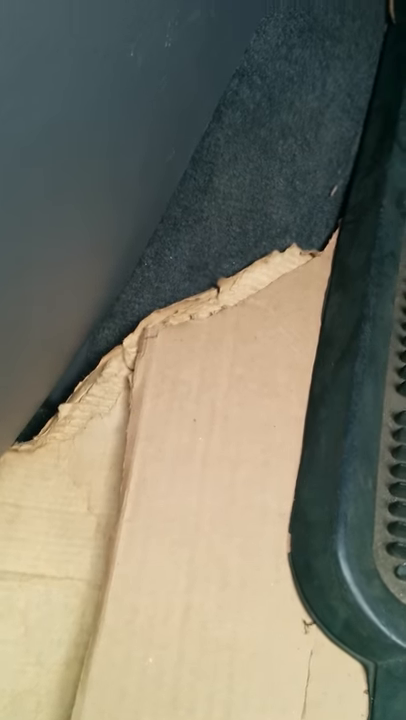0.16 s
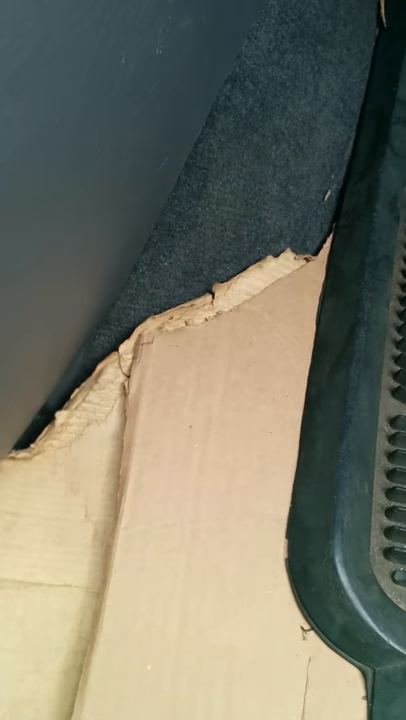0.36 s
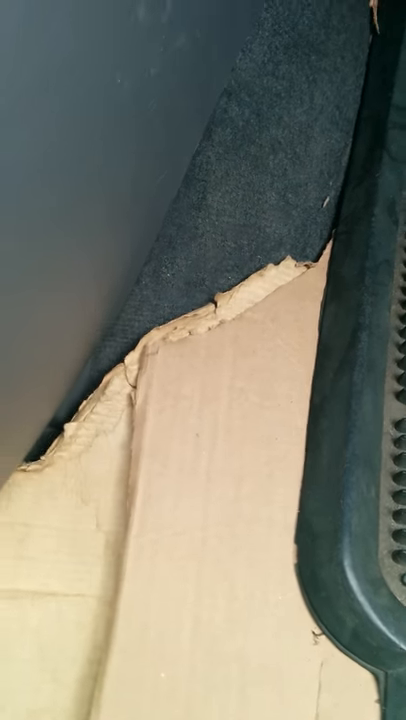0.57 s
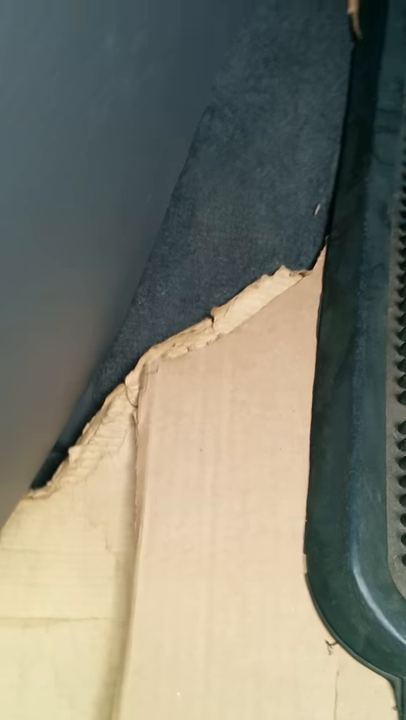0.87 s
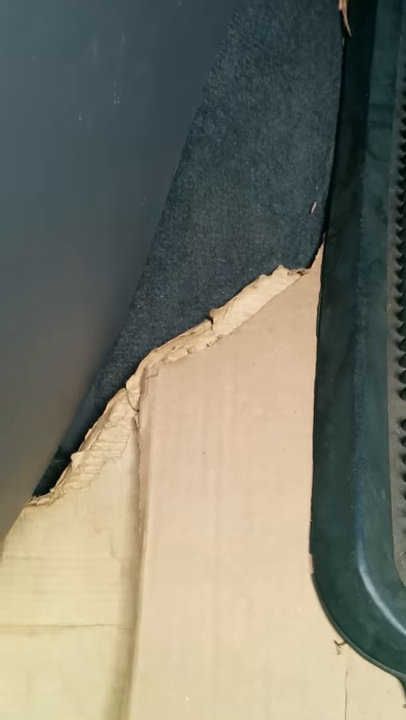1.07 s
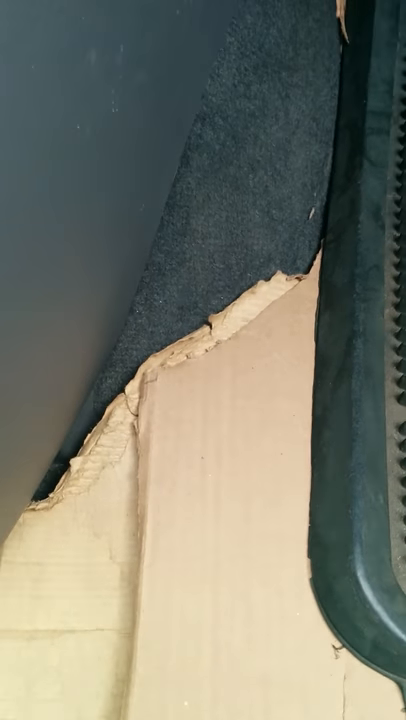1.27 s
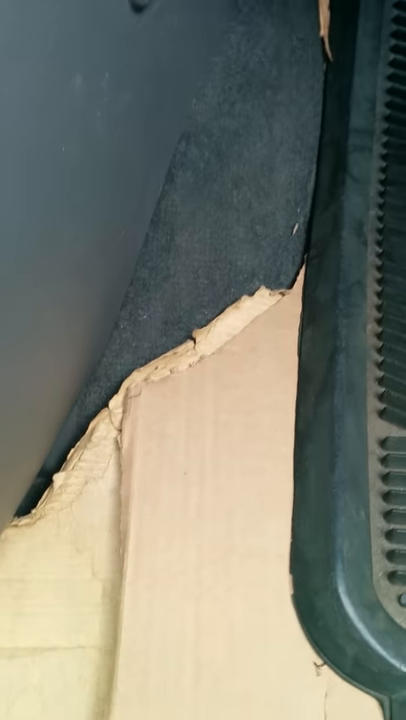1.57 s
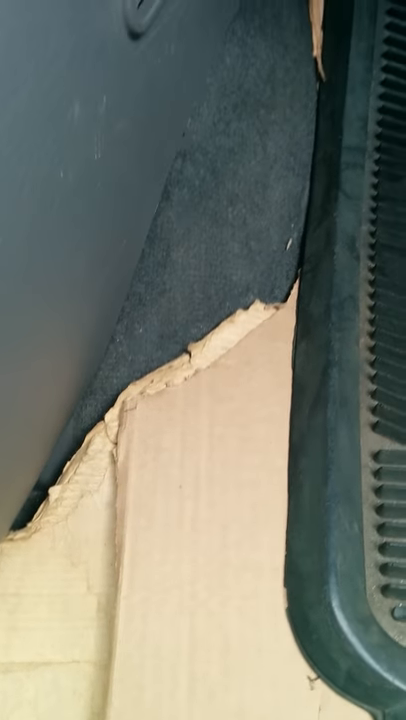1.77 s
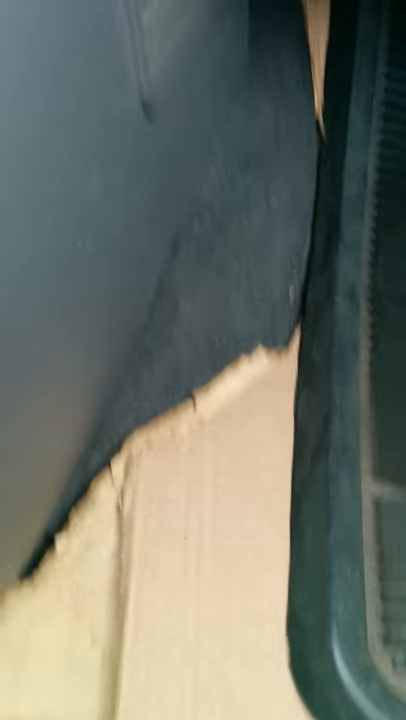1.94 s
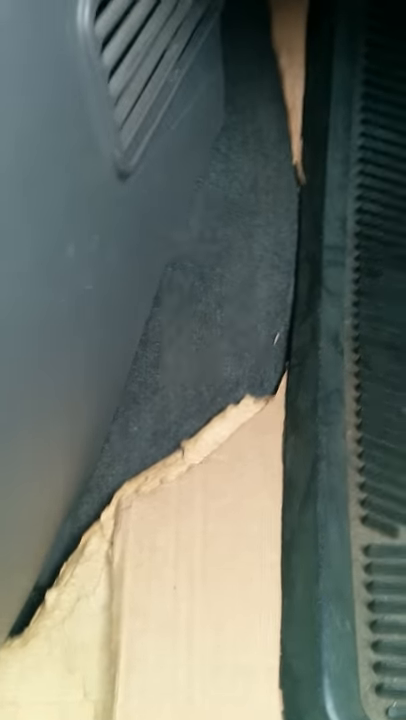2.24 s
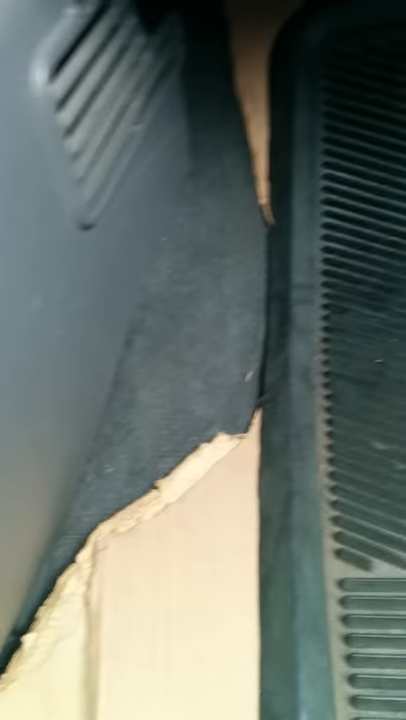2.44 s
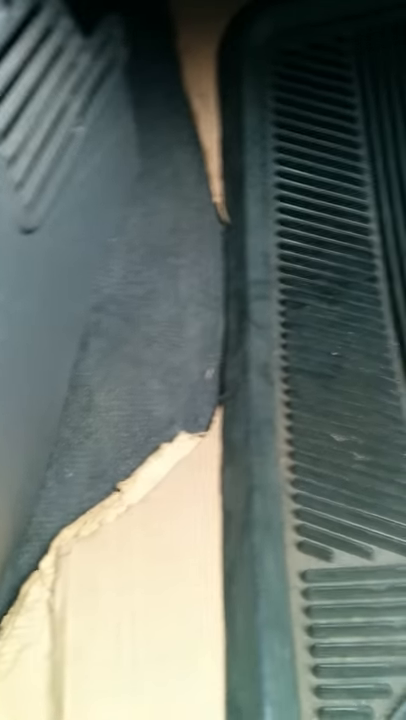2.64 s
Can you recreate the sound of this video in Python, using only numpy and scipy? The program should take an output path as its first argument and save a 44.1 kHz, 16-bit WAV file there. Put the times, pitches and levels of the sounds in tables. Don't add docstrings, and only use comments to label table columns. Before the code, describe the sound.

Close phone microphone near a van floor mat: deep wavering engine rumble throughout, rapid metallic rattling and hollow panel knocks strongest in the first second, patchy afterwards, a short second burst, then mostly rumble.

```python
import sys
import numpy as np
from scipy import signal
from scipy.io import wavfile
from scipy.ndimage import uniform_filter1d

SR = 44100
rng = np.random.default_rng(int(sys.argv[2]) if len(sys.argv) > 2 else 0)


def generate_wav(sig):
    pcm = np.round(np.clip(np.atleast_2d(sig).T, -1, 1) * 32767).astype(np.int16)
    wavfile.write(sys.argv[1], SR, pcm)


def linear_from_db(decibels):
    return 10 ** (np.asarray(decibels, float) / 20)


N = 123921

# (centre [s], half length [s], frequency [Hz], level [dB])
BOOM_SURGES = [(0.038, 0.024, 52.2, -15.5), (0.141, 0.063, 49.5, -7.5), (0.218, 0.028, 48.9, -19),
               (0.289, 0.031, 48, -8.5), (0.396, .05, 45.3, -18), (0.481, 0.11, 49, -19),
               (0.601, 0.071, 51, -18), (0.759, 0.058, 46.75, -12), (0.899, 0.084, 49, -11.5),
               (1.009, 0.031, 50.4, -16), (1.111, 0.024, 46.9, -13.5), (1.189, 0.043, 48.25, -6.5),
               (1.29, 0.056, 49, -13), (1.42, 0.075, 50, -13), (1.57, 0.1, 49, -12.5),
               (1.659, 0.033, 50.8, -33), (1.82, 0.06, 49, -11), (1.93, 0.02, 52.26, -15),
               (2.032, 0.068, 53, -14.5), (2.199, 0.049, 53, -22), (2.327, .06, 53.5, -33),
               (2.52, 0.091, 48, -13.5), (2.619, .06, 49, -14), (2.78, 0.086, 52, -16.5)]
# (time [s], speed [turns/s], upper orders [dB], lower orders [dB])
SHAFT_SPEED = [
    (0, 16.6, -1.5, -8.5),
    (.5, 18.2, 1.5, 0.5),
    (1.0, 16.45, -0.5, -2.5),
    (1.35, 17.8, -1.5, -6.5),
    (1.55, 16.8, 0, 4.5),
    (1.9, 18, 1, 2),
    (2.3, 17.6, -4, -2),
    (2.6, 17.8, -1.5, 3),
    (2.81, 16.5, -1.5, 0.5),
]
# (multiple of shaft speed [-], level [dB rms], wavering [dB])
SHAFT_ORDERS = [(4, -28.5, 3.5), (6, -24.5, 0.5), (7, -38.5, 7), (8, -41.5, 1), (9, -35, 4), (11, -26, -1),
                (12, -29, 2), (15, -42.5, 3), (16, -40, 3), (20, -44.5, -0.5), (24, -43.5, 4.5),
                (27, -39.5, 2), (29, -38.5, 1.5)]
# (frequency [Hz], density [dB per Hz])
RUMBLE_SPECTRUM = [(12, -38), (20, -10.5), (53, -5), (113, -13.5), (135, -10.5), (200, -20.5), (234, -13.5),
                   (300, -19), (2200, -45.5), (2860, -92), (4840, -120)]
# (frequency [Hz], density [dB per Hz])
HISS_SPECTRUM = [(1000, -9), (1800, -3), (3070, -4.5), (4200, -10), (5080, -9), (5820, -10.5),
                 (10000, -15.5), (17000, -17.5)]
# (time [s], gain [dB])
PHONE_NEARNESS = [
    (0, 2),
    (.8, 6.5),
    (1.3, 1.5),
    (1.8, 3),
    (2.2, -0.5),
    (2.81, 0),
]
# (frequency [Hz], width [Hz], level [dB])
PANEL_MODES = [(473.3, 33, 6.5), (519, 73, 2), (878, 34, -6.5), (1000, 180, 1), (1264, 88, -1),
               (1391, 34, 0), (1521.5, 36, -0.5), (1730, 82, -9), (2470, 210, -16)]
# (frequency [Hz], width [Hz], level [dB])
STRUT_MODES = [(714.4, 13.4, 2.5)]
# (time [s], ring [dB], fizz [dB], panel [dB])
CLATTERS = [(0.0298, -36, -47, -25.5), (0.085, -31.5, -49, -25), (0.1462, -32, -40, -22.5),
            (0.204, -34, -49, -26), (0.264, -31.5, -42.5, -23.5), (0.3212, -33.5, -48, -26),
            (0.384, -35.5, -45.5, -24), (0.4357, -34, -46, -25.5), (0.549, -32, -53, -31),
            (0.607, -31, -38.5, -25.5), (0.6644, -33, -53, -22), (0.7213, -30, -42, -22.5),
            (0.7801, -33.5, -48, -23.5), (0.8346, -31.5, -45.5, -22), (0.893, -33.5, -46.5, -23.5),
            (0.9479, -35, -47, -23), (1.0442, -34, -49, -25), (1.1994, -40, -52, -35),
            (1.2544, -34.5, -47, -26.5), (1.4165, -40.5, -55, -27), (1.5297, -44, -53, -27.5),
            (1.6972, -30.5, -38, -22.5), (1.7549, -36.5, -48, -24), (1.8099, -31.5, -47, -22),
            (1.867, -39, -54, -27), (1.9244, -39, -51, -26.5), (1.982, -36, -48.5, -28),
            (2.0384, -57, -59, -31), (2.0945, -40, -52, -27.5), (2.152, -43, -50, -41)]
# (time [s], panel [dB])
SOFT_THUMPS = [(.495, -41), (1.005, -31), (1.11, -35), (1.15, -48), (1.31, -29), (1.365, -47),
               (1.475, -28.5), (1.585, -25.5), (1.64, -33), (2.21, -48), (2.265, -29), (2.32, -36),
               (2.38, -30), (2.44, -47), (2.5, -38), (2.56, -34.5), (2.615, -38), (2.67, -32.5),
               (2.73, -40), (2.785, -33)]
# (frequency [Hz], width [Hz], level [dB])
RING_MODES = [(2937, 220, 4.5), (3270, 110, 1), (4100, 790, -4.5), (4650, 110, -5), (4820, 120, -1.5),
              (5330, 91, 1), (5540, 210, 0.5), (5770, 310, 1.5), (6260, 600, -13)]
# (frequency [Hz], width [Hz], level [dB])
FIZZ_MODES = [(6510, 570, 7.5), (8100, 680, -2), (10030, 810, 8.5), (11300, 200, -0.5), (13500, 1400, 5.5),
              (8540, 15600, 15.5)]
# (time [s], level [dB])
STRUT_DRIVE = [(0, -27.5), (.25, -26.5), (.45, -38), (.65, -27.5), (.8, -30), (.95, -23), (1.1, -32.5),
               (1.35, -35), (1.65, -39), (1.78, -29), (2.0, -39), (2.81, -35.5)]
# (time [s], level [dB], frequency [Hz])
METAL_TICKS = [(0.1506, -39, 9991), (0.1524, -31, 5719), (0.1556, -45.8, 11369), (0.1556, -43.9, 9302),
               (0.1601, -31, 5030), (0.1642, -37, 4961), (0.2653, -39, 9715), (0.2735, -44, 11231),
               (0.2735, -44.5, 9853), (0.4385, -49.8, 13436), (0.6082, -36, 7500), (0.61, -45.3, 12265),
               (0.6113, -44.0, 9853), (0.6113, -36, 5167), (0.6118, -41.5, 6546), (0.6141, -49.5, 13436),
               (0.6172, -45.6, 10473), (0.62, -43, 5440), (0.62, -34, 3100), (0.6222, -48.1, 11507),
               (0.624, -41, 7028), (0.6771, -37, 5443), (0.6771, -37, 3160), (0.7252, -34, 11500),
               (0.7261, -29, 5280), (0.7338, -33.8, 5540), (0.8381, -39, 9700), (0.8454, -47.0, 9577),
               (0.849, -51, 5500), (0.9061, -36, 5700), (1.7034, -29, 5180), (1.7039, -45.1, 8400),
               (1.7048, -35, 11600), (1.7066, -46.7, 13436), (1.7088, -43.3, 8406), (1.7107, -35, 4823),
               (1.7125, -41, 3110), (1.7129, -41, 11438), (1.7134, -45.9, 9853), (1.7197, -45.4, 10129)]
# (time [s], level [dB], frequency [Hz])
PANEL_THUDS = [(0.1542, -26, 905), (0.1633, -34.7, 1500), (0.2231, -33, 1530), (0.3265, -30.5, 930),
               (0.4444, -37, 870), (0.4553, -34, 1520), (0.6186, -28.5, 1340), (0.6494, -25, 457),
               (0.6821, -37, 1435), (0.6966, -25.8, 520), (0.7274, -29, 870), (0.7347, -29, 1529),
               (0.7383, -31, 1157), (0.7546, -20, 528), (0.7982, -34.5, 1527), (0.849, -31.2, 1520),
               (0.9107, -30, 1530), (0.9288, -21, 497), (0.9596, -39, 885), (0.9596, -33.4, 1380),
               (0.9887, -30, 485), (1.0177, -35.5, 1348), (1.0776, -34.4, 1364), (1.0939, -28, 473),
               (1.2717, -22, 489), (1.3896, -26.7, 470), (1.4277, -35.0, 1377), (1.62, -24, 547),
               (1.6853, -23, 465), (1.7088, -36, 1532), (1.7088, -27, 434), (1.7705, -33.8, 1515),
               (1.8177, -18, 456), (1.8231, -37, 1305)]


def evened(x):
    return x / np.sqrt(np.mean(x ** 2) + 1e-20)


def curve(rows, axis):
    rows = np.asarray(rows, float)
    return np.interp(np.arange(N) / SR, rows[:, 0], rows[:, axis])


def drift(rate_hz):
    f_hz = np.geomspace(rate_hz / 10, rate_hz, num=12)[:, None]
    t_s = np.arange(0, N + 200, 100) / SR
    sines = np.sin(2 * np.pi * (f_hz * t_s + rng.random((12, 1))))
    slow = (sines / f_hz ** 0.41).sum(0)
    return evened(np.interp(np.arange(N) / SR, t_s, slow))


def body(x, modes):
    out = np.zeros(N)
    for k, (hz, width_hz, db) in enumerate(modes):
        radius = np.exp(-np.pi * width_hz / SR)
        pole = radius * np.exp(2j * np.pi * hz / SR)
        mode = signal.lfilter([np.sqrt(1 - radius)], [1, -pole], x).imag
        out += (-1) ** k * linear_from_db(db) * mode
    return out


def opening_step():
    return 0.35 * np.exp(-np.arange(N) / SR / 0.00073)


def boom():
    t_s = np.arange(N) / SR
    sway_hz = 49 * 0.024 * drift(12)
    sway = 2 * np.pi * np.cumsum(sway_hz) / SR
    steady_hum = (1.4, 11, 50, -21.5)
    surges = np.zeros(N)
    for centre_s, half_s, hz, db in [*BOOM_SURGES, steady_hum]:
        u_s = t_s - centre_s
        swell = linear_from_db(db) * np.exp(-2 * (u_s / half_s) ** 2)
        surges += swell * np.sin(2 * np.pi * (hz * u_s + rng.random()) + sway)
    air = body(rng.standard_normal(N), [(49, 61, 0)])
    air = evened(body(air, [(51, 29, 0)]))
    return np.sqrt(2) * surges + linear_from_db(-27) * air


def orders():
    turns = np.cumsum(curve(SHAFT_SPEED, axis=1)) / SR
    out = np.zeros(N)
    for multiple, db, waver_db in SHAFT_ORDERS:
        load_db = curve(SHAFT_SPEED, axis=2 if multiple > 9.5 else 3)
        level = linear_from_db(db + waver_db * drift(9.7) + load_db)
        cycles = round(multiple) * turns + 0.146 * drift(8) + rng.random()
        out += level * np.sin(2 * np.pi * cycles)
    return np.sqrt(2) * out


def noise(spectrum, patchy_db):
    hz = np.fft.rfftfreq(2048, 1 / SR)
    real, imag, patches = rng.standard_normal((N // 512 + 5, 1025, 3)).T
    patches = uniform_filter1d(patches, size=8, axis=0)
    patches = evened(uniform_filter1d(patches, size=6, axis=1))
    f_hz, db = np.transpose(spectrum)
    shape_db = np.interp(np.log(hz + 1), np.log(f_hz + 1), db, left=-80, right=-80)
    frames = (real + 1j * imag) * linear_from_db(shape_db[:, None] + patchy_db * patches)
    return evened(signal.istft(frames, nperseg=2048, noverlap=1536)[1][:N])


def rumble(near_db):
    return linear_from_db(-20.5 + 0.22 * near_db) * noise(RUMBLE_SPECTRUM, patchy_db=0.5)


def hiss(near_db):
    return linear_from_db(-46.5 + 0.31 * near_db) * noise(HISS_SPECTRUM, patchy_db=1.7)


def chatter(near_db):
    hum = evened(body(rng.standard_normal(N), [*PANEL_MODES, *STRUT_MODES]))
    return linear_from_db(near_db) * linear_from_db(-39.5 + 1.2 * drift(4.9)) * hum


def kicks(rows, axis, lag_s):
    out = np.zeros(N)
    for row in rows:
        out[round((row[0] + lag_s) * SR)] += linear_from_db(row[axis])
    return out


def bursts(clicks, rise_s, hold_s, fall_s):
    t_s = np.arange(0, .12, 1 / SR)
    sag = linear_from_db(-150 * t_s)
    release = np.exp(-np.maximum(t_s - hold_s, 0) / fall_s)
    return signal.oaconvolve(clicks, (1 - np.exp(-t_s / rise_s)) * sag * release)[:N]


def hits():
    hits_per_s, spread_db = 9000, 1.1
    struck = rng.random(N) < hits_per_s / SR
    size = np.minimum(rng.exponential(1, N), 4)
    impacts = rng.standard_normal(N) * linear_from_db(spread_db * size) * struck
    return evened(impacts) + 0.65 * rng.standard_normal(N)


def rattled(modes, db, envelope):
    rattle = hits()
    return linear_from_db(db) * body(rattle * envelope, modes) / np.std(body(rattle, modes))


def rung(modes, clicks):
    impulse = np.arange(N) == 0
    return body(clicks, modes) / abs(body(impulse, modes)).max()


def loose_part():
    ring_clicks = kicks(CLATTERS, axis=1, lag_s=0)
    ring_clicks += linear_from_db(-16.0) * kicks(SOFT_THUMPS, axis=1, lag_s=-0.0033)
    fizz_clicks = kicks(CLATTERS, axis=2, lag_s=0)
    ring_env = bursts(ring_clicks, rise_s=0.0029, hold_s=0.022, fall_s=0.022)
    fizz_env = bursts(fizz_clicks, rise_s=0.0014, hold_s=0.014, fall_s=0.015)
    return rattled(RING_MODES, -7, ring_env) + rattled(FIZZ_MODES, 0.7, fizz_env)


def panel(thumps):
    env = bursts(thumps, rise_s=0.001, hold_s=0.016, fall_s=0.013)
    return linear_from_db(-1.5) * rung(PANEL_MODES, thumps) + rattled(PANEL_MODES, -6, env)


def strut(thumps):
    drive = (thumps > 0) * linear_from_db(curve(STRUT_DRIVE, axis=1))
    env = bursts(drive, rise_s=0.0032, hold_s=0.029, fall_s=0.0066)
    hz = 707 * (1 + 0.0081 * drift(12))
    return 1.2 * env * np.sin(2 * np.pi * np.cumsum(hz) / SR)


def knocks():
    thumps = kicks(CLATTERS, axis=3, lag_s=0.003833) + kicks(SOFT_THUMPS, axis=1, lag_s=0)
    return loose_part() + panel(thumps) + strut(thumps)


def pings(rows, rise_s, fall_s):
    t_s, out = np.arange(N) / SR, np.zeros(N)
    for peak_s, db, hz in rows:
        at = slice(max(round((peak_s - .03) * SR), 0), round((peak_s + .08) * SR))
        u_s = t_s[at] - peak_s
        env = np.where(u_s < 0, np.exp(-(u_s / rise_s) ** 2), np.exp(-u_s / fall_s))
        out[at] += linear_from_db(db) * env * np.sin(2 * np.pi * hz * u_s)
    return out


def scene():
    near_db = curve(PHONE_NEARNESS, axis=1)
    engine = opening_step() + boom() + orders()
    bed = rumble(near_db) + hiss(near_db) + chatter(near_db)
    ticks = pings(METAL_TICKS, rise_s=.0012, fall_s=0.0022)
    thuds = pings(PANEL_THUDS, rise_s=0.0062, fall_s=0.0095)
    return (engine + bed + knocks() + ticks + thuds)[None]


def low_pass(x):
    return signal.sosfilt(signal.butter(12, 15710, fs=SR, output="sos"), x)


def record(dry):
    bass_cut = signal.butter(3, 32.8, "high", fs=SR, output="sos")
    cut = signal.sosfilt(bass_cut, dry)
    mix = 1.098 * np.tanh(cut / 1.136)
    return low_pass(mix)


dry = scene()
out = record(dry)
generate_wav(out)
```